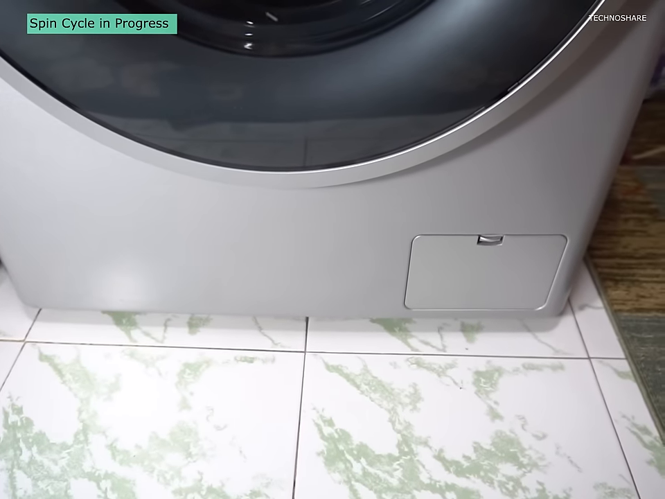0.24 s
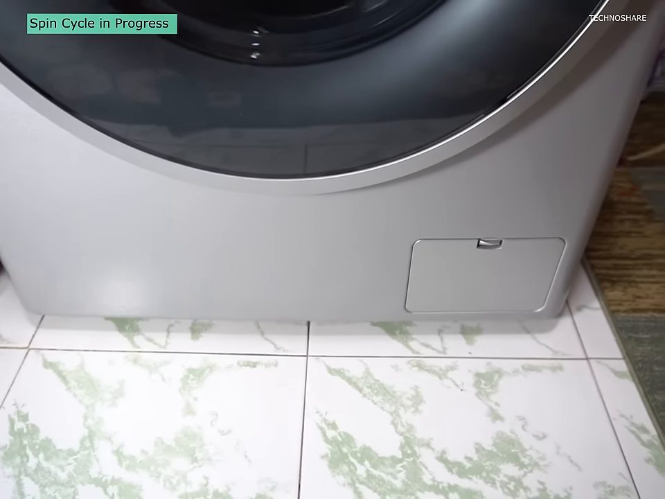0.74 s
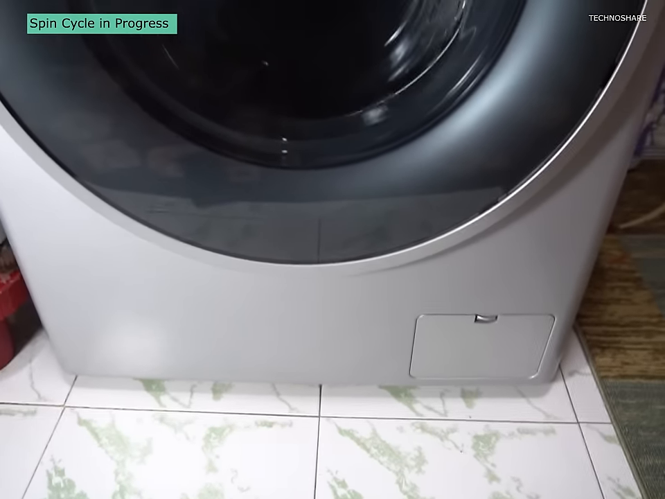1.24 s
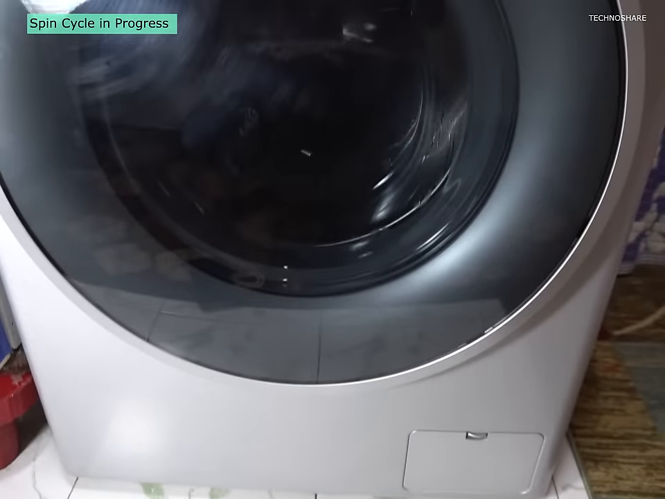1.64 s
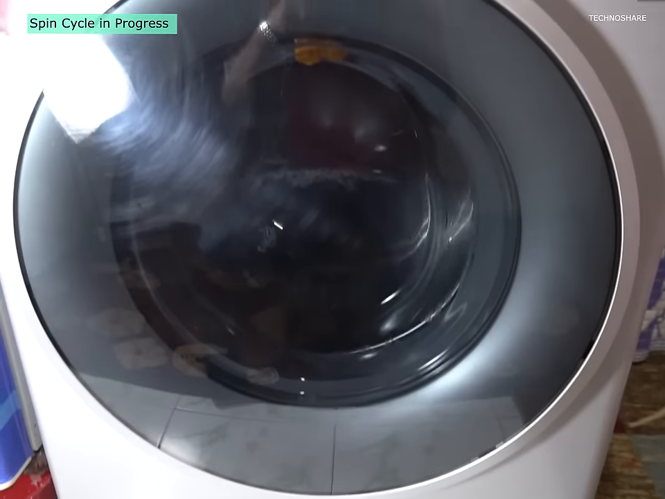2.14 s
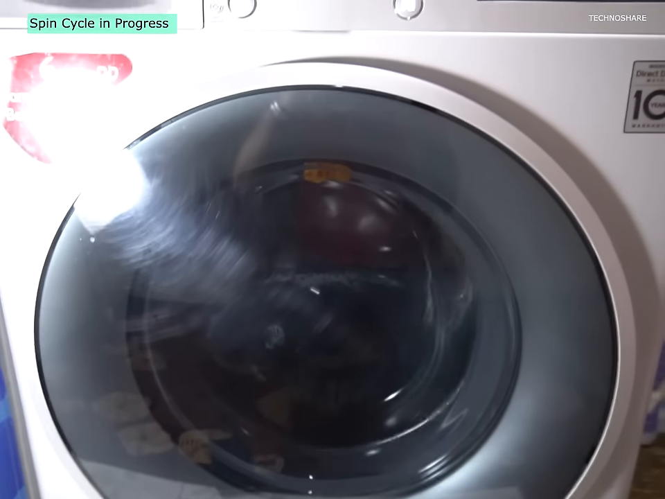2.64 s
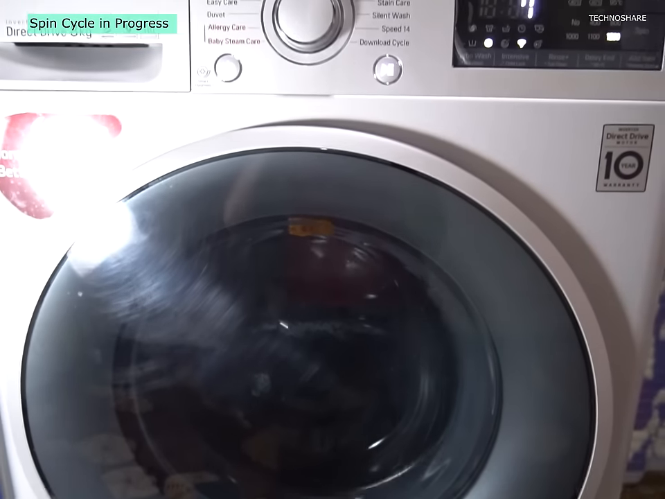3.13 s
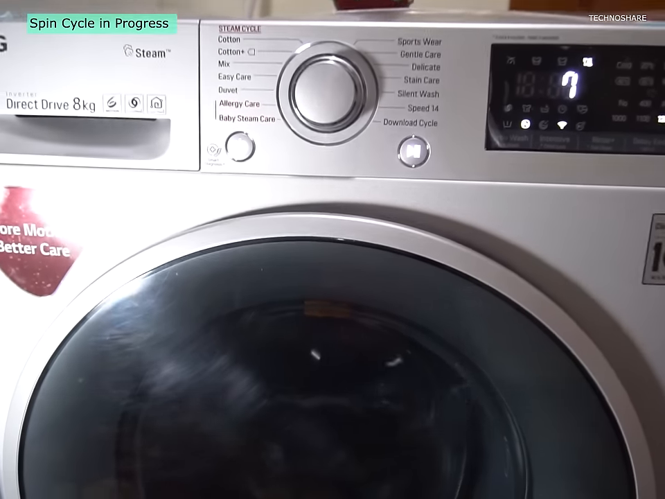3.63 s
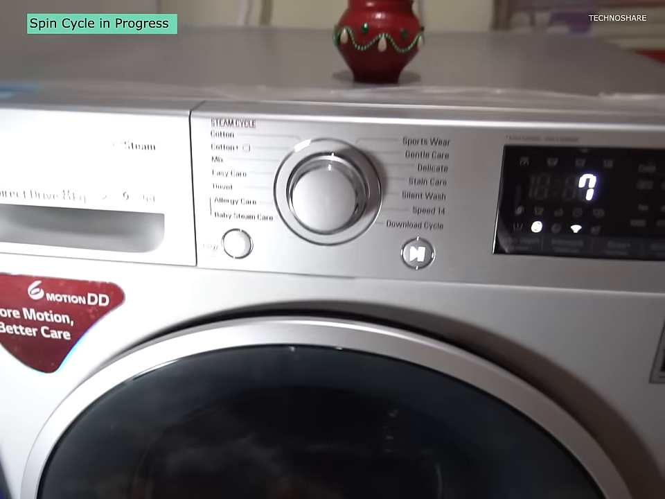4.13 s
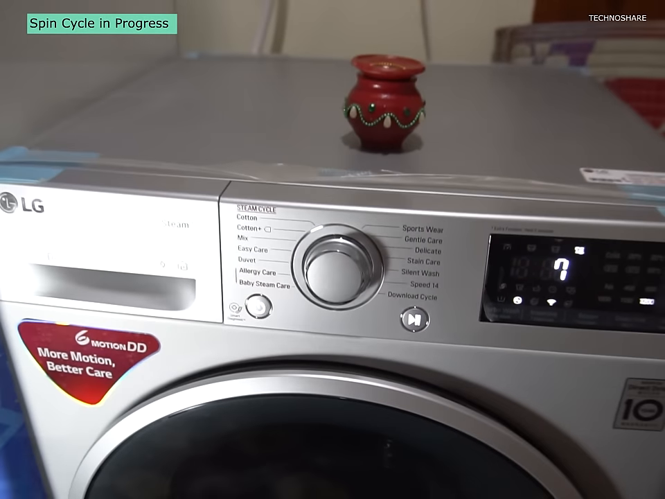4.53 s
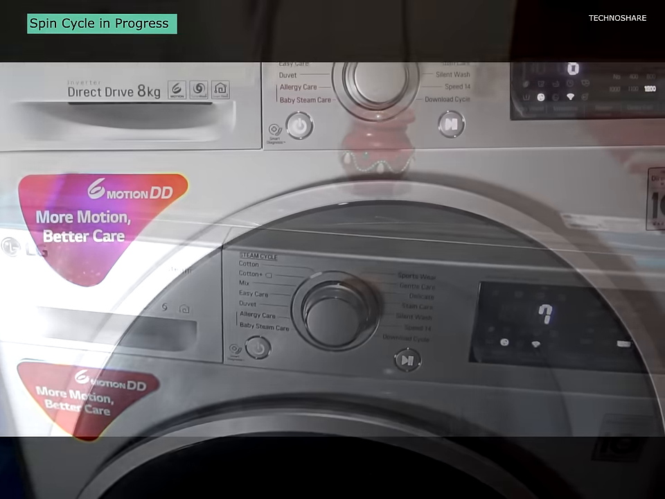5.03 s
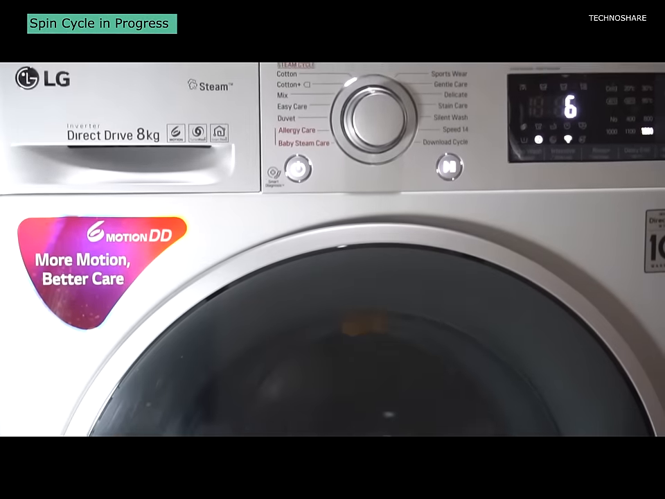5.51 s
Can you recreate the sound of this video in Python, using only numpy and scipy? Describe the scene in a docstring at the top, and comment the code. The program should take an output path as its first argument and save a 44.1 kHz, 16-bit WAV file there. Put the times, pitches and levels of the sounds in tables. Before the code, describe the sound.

A washing machine spins close by with a throbbing hum and rushing air, then blends into a faster, louder spin.

```python
"""A small tiled room, stereo microphone close to a spinning front-loading washing machine. The unbalanced drum
throbs once a turn over a rush of air and water and the drain pump's hum; a seal swishes, a loose part rattles,
the load ticks, the motor sings and its inverter whines. The microphone rises from near the floor to lid height.
Near the end the scene dissolves into another, of a faster, louder spin that shakes the cabinet."""
import sys
import numpy as np
from scipy import signal
from scipy.fft import rfft, irfft
from scipy.io import wavfile

SR = 44100
rng = np.random.default_rng(int(sys.argv[2]) if len(sys.argv) > 2 else 0)


def master(y):
    """Save y as 16-bit WAV."""
    cut = np.clip(np.atleast_2d(y).T, -1, 1)
    pcm = np.round(cut * 32767)  # scale
    wavfile.write(sys.argv[1], SR, pcm.astype(np.int16))


N = 254456
T = np.arange(N) / SR
HZ = np.fft.rfftfreq(N, 1 / SR)

# drum speed in each spin: t/s, speed/(turns per s)
SLOW_SPEED = [(0, 17.64), (.6, 17.56), (4.5, 17.83), (5.8, 17.88)]
FAST_SPEED = [(0, 22.1), (5.8, 22.1)]
# crossfade between the spins: t/s, gain
SLOW_FADE = [(0, 1), (4.6, 0.95), (4.95, 0.94), (5.2, 0.54), (5.45, .04)]
FAST_FADE = [(4.55, 0), (4.7, .3), (5, .68), (5.3, .97), (5.77, 1.03)]
# microphone's path up the front of the machine: t/s, height (0 near the floor, 1 at the lid)
MIC_HEIGHT = [(0, 0), (1.1, 0.1), (3.2, 0.79), (4.3, 1)]
# throb in the slow spin: order (multiple of the drum speed), floor level/dB, lid level/dB
SLOW_THROB = [(1, -35, -38.5), (2, -35, -34.5), (3, -25.5, -23.5), (4, -51, -57), (5, -32.3, -34.3),
              (6, -41, -40.5), (7, -46.5, -49), (8, -50, -56), (9, -40, -47.5), (10, -49.5, -54.5),
              (11, -47, -57), (12, -55.5, -56), (14, -47.5, -51), (15, -53, -53), (17, -53, -51.5),
              (30, -56, -61.5), (36, -59.5, -68), (37, -57.5, -64.5), (42, -61.5, -65.5)]
# throb in the fast spin: order, level/dB
FAST_THROB = [(1, -15.5), (2, -17.5), (3, -24.5), (4, -35.5), (5, -30), (6, -47.5), (7, -37.5), (8, -41),
              (9, -38), (10, -48), (11, -40.5), (13, -43), (21, -51.5), (22, -48.5), (23, -46.5), (24, -37),
              (27, -53), (29, -52.5), (33, -53), (36, -57), (39, -68), (42, -67), (43, -57.5), (96, -60)]
# air and water round the drum: f/Hz, density/(dB per Hz)
SLOW_RUSH = [(8, -92), (22, -52), (31, -81), (47, -55.5), (75, -68), (110, -62.5), (215, -68.5), (300, -67),
             (520, -74.5), (720, -79), (1100, -84), (2000, -94.5), (2700, -101), (3700, -101.5),
             (4700, -106), (9500, -104), (15500, -111)]
FAST_RUSH = [(8, -65), (22, -47), (60, -67), (115, -59), (200, -61), (370, -66), (560, -72), (830, -70.5),
             (1300, -79.5), (2400, -86), (5000, -97), (9000, -99), (12000, -111), (15500, -115)]
# cabinet panel resonances: f/Hz, width/Hz, boost/dB
PANELS = [(248, 19, 0), (313, 12, 2.5), (385, 55, 2), (445, 26, 1.5), (576, 20, 4.5), (555, 81, 2),
          (1183, 9.3, 6.5), (1294, 16, 2.5), (3450, 160, 0)]
# low motor tones: order, floor level/dB, lid level/dB
MOTOR_TONES = [(21, -52.5, -45), (27, -45, -55)]
# quiet spots in the room's standing waves, crossed by the microphone: order, t/s, depth/dB
QUIET_SPOTS = [(21, .85, 10), (27, .57, 7), (27, 1.65, 9)]
# motor's high whine: t/s, level/dB
WHINE_LEVEL = [(1.8, -74), (2.1, -70.5), (3, -67), (3.55, -81), (4, -64), (4.6, -69.5)]
# seal's crisp touch and softer swish: f/Hz, density/(dB per Hz)
SEAL_TOUCH = [(4000, -120), (6500, -103), (8500, -97.5), (10500, -96.5), (11700, -102), (13500, -100),
              (15500, -106)]
SEAL_SWISH = [(2500, -112), (4500, -108), (8000, -105), (10400, -102), (11800, -110), (15500, -112)]
# strength of the seal's stroke: t/s, gain/dB
SEAL_GAIN = [(0, 2), (.45, 4), (1.3, 2.5), (2.2, 2), (3.3, 2), (4.1, 1.5), (5, -4)]
# loose part low in the cabinet: f/Hz, density/(dB per Hz)
RATTLE_SPECTRUM = [(700, -105), (1100, -86), (1400, -76), (1700, -89.5), (2300, -89), (3500, -99),
                   (6000, -115)]
# load striking the drum, after a click at the very start: t/s, level/dB, f/Hz, width/octaves, t60/s
LOAD_TICKS = [(0.027, -41, 4470, 0.68, 0.011), (.605, -48, 1320, 0.14, 0.082),
              (2.008, -44, 3300, .7, 0.013), (3.558, -52.5, 9000, 0.33, 0.13),
              (3.612, -56, 7500, 0.82, 0.24), (4.5378, -52.5, 3450, 0.24, .05),
              (4.73, -65.5, 6800, .015, 0.9)]
# inverter's switching tone, split by the motor's poles: f/Hz in one list, level/dB in the other
SIDEBAND_HZ = [14203, 14628]
SIDEBAND_DB = [-70, -68.5]
# faint motor whistles: f/Hz, width/Hz, floor level/dB, lid level/dB
WHISTLES = [(2540, 13, -77, -76.5), (4130, 60, -72, -88)]
# likeness of the noise in the microphone's two channels: f/Hz, correlation
MIC_LIKENESS = [(60, .997), (600, .99), (1400, .78), (2800, .52), (5600, .38), (15000, .28)]
# phase between the channels in each spin: f/Hz, left lead/rad
SLOW_LEAD = [(0, 0), (600, .05), (1210, .2), (2840, .8), (5250, 3.1), (9130, 5.1), (15000, 9.4)]
FAST_LEAD = [(0, 0), (600, -.12), (2000, -.3), (5000, -1), (8000, -2.5), (15000, -6.4)]
# microphone balance: f/Hz, left minus right/dB
MIC_BALANCE = [(60, -1.9), (110, -1.5), (380, -1.4), (1300, -.6), (4400, -1.3), (8100, .8), (15000, 2.6)]


def throb(turns, orders, waver, waver_hz, smear=0):
    """The unbalanced tub shakes the cabinet at multiples of its speed; two levels blend by height."""
    return sum(amp(at_height(row[1], row[-1])) * partial(turns, row[0], waver, waver_hz, smear)
               for row in orders)


def rush(turns, spectrum, lead, pulse_db, peak_turn, grind_db):
    """Air and water noise and a repeating grind, coloured by the panels and swelling once a turn."""
    panels_db = sum(db / (1 + (2 * (HZ - hz) / width) ** 2) for hz, width, db in PANELS)
    density_db = shape(spectrum) + panels_db
    # the same bumps come round on each turn, making a dense comb of faint lines in the midrange
    bumps = np.interp(turns % 1 * 2048, np.arange(2048), rng.standard_normal(2048))
    midrange_db = shape([(150, -40), (300, 0), (1500, 0), (4000, -20)])
    grind = irfft(rfft(bumps) * amp(density_db + midrange_db + grind_db), N) * np.sqrt(SR / 2)
    swell = amp(pulse_db * np.cos(2 * np.pi * (turns - peak_turn)))
    return (noise(density_db, lead) + grind) * swell


def water_surge(start_s=3.33, rise_s=0.18, fall_s=2.4, peak_db=2):
    """Gain on the rush, which surges once as water is flung out."""
    rise = np.clip((T - start_s) / rise_s, 0, 1)
    fall = np.exp(-np.maximum(T - start_s - rise_s, 0) / fall_s)
    return amp(peak_db * rise * fall)


def pump(mains_hz=50.13):
    """The drain pump hums at mains frequency and its double, which is strongest near the floor."""
    phase = 2 * np.pi * mains_hz * T
    return np.sqrt(2) * (amp(-36.5) * np.cos(phase) + amp(at_height(-40.5, -46.5)) * np.cos(2 * phase))


def motor(turns, whine_order=120, waver=0.29, waver_hz=5, dip_s=0.12):
    """The motor's poles sing: a thin whine, and two tones that dip as the microphone meets quiet spots."""
    out = amp(curve(WHINE_LEVEL)) * partial(turns, whine_order, waver, waver_hz)
    for order, floor_db, lid_db in MOTOR_TONES:
        dip_db = sum(depth_db * np.exp(-((T - at_s) / dip_s) ** 2)
                     for spot_order, at_s, depth_db in QUIET_SPOTS if spot_order == order)
        out += amp(at_height(floor_db, lid_db) - dip_db) * partial(turns, order, waver, waver_hz)
    return out


def seal(turns, uneven_db=1.4):
    """The drum brushes its seal once a turn: a crisp touch, then a swish that dies away."""
    touch = noise(shape(SEAL_TOUCH)) * stroke(turns, rise_turns=.008, fall_turns=.09)
    swish = noise(shape(SEAL_SWISH)) * stroke(turns, rise_turns=.05, fall_turns=.25)
    return (touch + swish) * amp(curve(SEAL_GAIN) + uneven_db * drift(12))


def rattle(turns, at_turn=0.512, uneven_db=0.7):
    """A loose part rattles half a turn after each swing, picked up mostly near the floor."""
    shake = stroke(turns - at_turn, rise_turns=0.034, fall_turns=0.069)
    return noise(shape(RATTLE_SPECTRUM)) * shake * amp(at_height(0, -16) + uneven_db * drift(11))


def load_ticks():
    """A click opens the sound, then the load ticks and pings against the drum: decaying bursts, each in its own
    band."""
    out = np.zeros((2, N))
    for start_s, db, hz, octaves, t60 in LOAD_TICKS:
        band_db = -10 * np.log10(1 + (np.log2((HZ + 1) / hz) / octaves) ** 4)
        decay = (T >= start_s) * amp(-60 * np.maximum(T - start_s, 0) / t60)
        out += amp(db) * unit(noise(band_db)) * decay
    return out


def inverter():
    """The inverter's switching sidebands and the motor's faint whistles, far back in the sound."""
    sidebands = sum(whistle(hz, width_hz=22, db=db) for hz, db in zip(SIDEBAND_HZ, SIDEBAND_DB))
    return sidebands + sum(whistle(hz, width, at_height(floor_db, lid_db))
                           for hz, width, floor_db, lid_db in WHISTLES)


def whistle(hz, width_hz, db):
    """A narrow resonance fed by noise: a fuzzy, flickering tone."""
    resonance_db = -10 * np.log10(1 + (2 * (HZ - hz) / width_hz) ** 2)
    return amp(db) * unit(noise(resonance_db))


def drum_turns(speed, swing_s):
    """Turns of the drum, counted from a moment when the load swings past."""
    turns = np.cumsum(curve(speed)) / SR
    return turns - np.interp(swing_s, T, turns)


def partial(turns, order, waver, waver_hz, smear=0, scatter_order=8):
    """One multiple of the drum speed: low ones line up in a lurch, high ones scatter and waver more."""
    # flexing panels delay each frequency differently, smearing the lurch into a smoother drone
    lag_turns = smear * (order - 4) ** 2 + rng.random() * (order >= scatter_order)
    unsteady = waver * order / (order + scatter_order) * (drift(waver_hz) + 1j * drift(waver_hz))
    rotation = np.exp(2j * np.pi * (order * turns + lag_turns))
    return -np.sqrt(2) * ((1 + unsteady) * rotation).imag


def stroke(turns, rise_turns, fall_turns):
    """A quick rise and slower fall, once a turn."""
    part = turns % 1
    envelope = (1 - np.exp(-part / rise_turns)) * np.exp(-part / fall_turns)
    return envelope / envelope.max()


def at_height(floor_db, lid_db):
    """A level that follows the microphone from floor to lid."""
    return floor_db + (lid_db - floor_db) * curve(MIC_HEIGHT)


def brighten_with_height(air, split_hz=2200):
    """The rush loses a little body and gains treble as the microphone rises."""
    body = irfft(rfft(air) / (1 + (HZ / split_hz) ** 4), N)
    return body * amp(at_height(0, -0.6)) + (air - body) * amp(at_height(1, 1.7))


def noise(density_db, lead=SLOW_LEAD):
    """Stereo noise of a given density; the channels part ways in the treble and one of them leads."""
    left, other = rfft(rng.standard_normal((2, N)))
    likeness = shape(MIC_LIKENESS)
    right = (likeness * left + np.sqrt(1 - likeness ** 2) * other) * np.exp(-1j * shape(lead))
    return irfft(np.array([left, right]) * amp(density_db), N) * np.sqrt(SR / 2)


def drift(rate_hz):
    """Slow random wandering of rms one."""
    low_pass = np.exp(-(HZ[:513] / rate_hz) ** 2)
    coarse = unit(irfft(rfft(rng.standard_normal(1024)) * low_pass))
    return np.interp(np.arange(N), np.linspace(0, N, len(coarse)), coarse)


def curve(points):
    """A time table, at every sample."""
    return np.interp(T, *np.transpose(points))


def shape(points):
    """A spectrum table, at every frequency."""
    hz, value = np.transpose(points)
    return np.interp(np.log(HZ + 1), np.log(hz + 1), value)


def amp(db):
    """Decibels to gain."""
    return 10 ** (np.asarray(db) / 20)


def unit(x):
    """Scales to an rms of one."""
    return x / np.sqrt(np.mean(x ** 2) + 1e-20)


def slow_spin():
    """The drum creeps up in speed, its third order beating against the pump's hum."""
    turns = drum_turns(SLOW_SPEED, swing_s=.007)
    tones = throb(turns, SLOW_THROB, waver=0.33, waver_hz=1.36, smear=.07) + motor(turns) + pump()
    air = rush(turns, SLOW_RUSH, SLOW_LEAD, pulse_db=0.73, peak_turn=0.012, grind_db=-12)
    air = brighten_with_height(air) * water_surge()
    return tones + air + seal(turns) + rattle(turns) + inverter() + load_ticks()


def fast_spin():
    """The faster spin: a heavy lurch each turn and a louder rush."""
    turns = drum_turns(FAST_SPEED, swing_s=5.0)
    air = rush(turns, FAST_RUSH, FAST_LEAD, pulse_db=1.0, peak_turn=0.91, grind_db=-4)
    return throb(turns, FAST_THROB, waver=0.15, waver_hz=6.2) + air


def scene():
    """Close to the machine, the scene of one spin dissolves into that of the other."""
    return slow_spin() * curve(SLOW_FADE) + fast_spin() * curve(FAST_FADE)


def record(dry):
    """The stereo microphone: slightly unequal channels, band-limited to 15720 Hz."""
    tilt = amp(np.array([[.5], [-.5]]) * shape(MIC_BALANCE))
    coloured = irfft(rfft(dry) * tilt, N)
    low_pass = signal.firwin(1023, 15720, window=("kaiser", 9), fs=SR)
    return signal.oaconvolve(coloured, low_pass[None], "same")


dry = scene()
out = record(dry)
master(out)
```